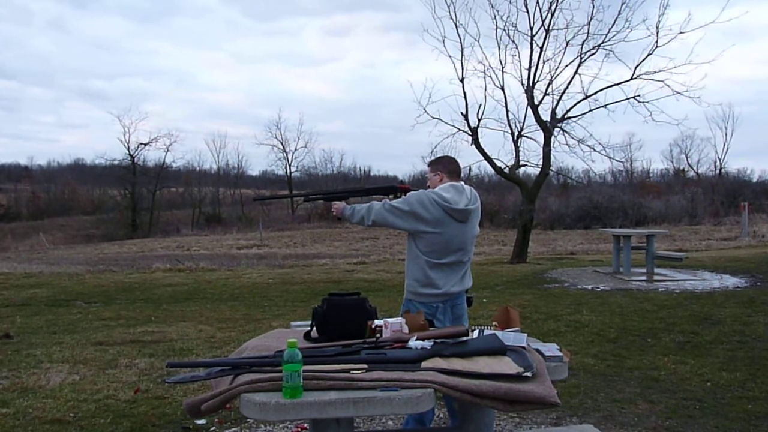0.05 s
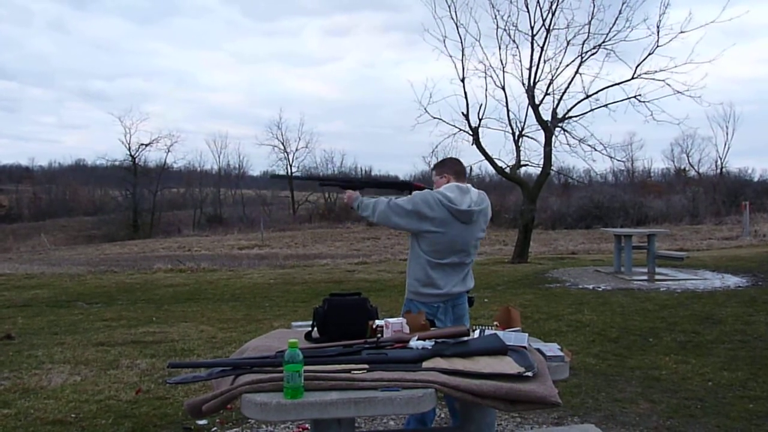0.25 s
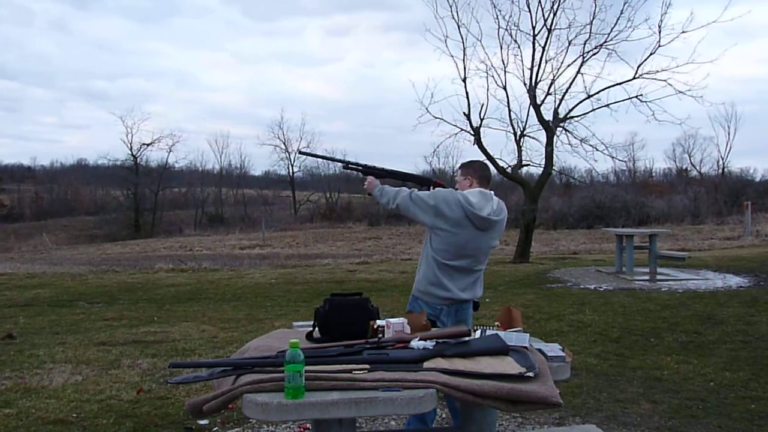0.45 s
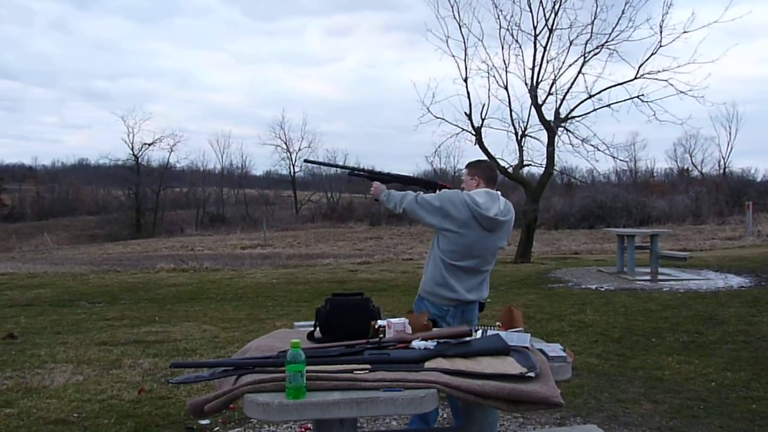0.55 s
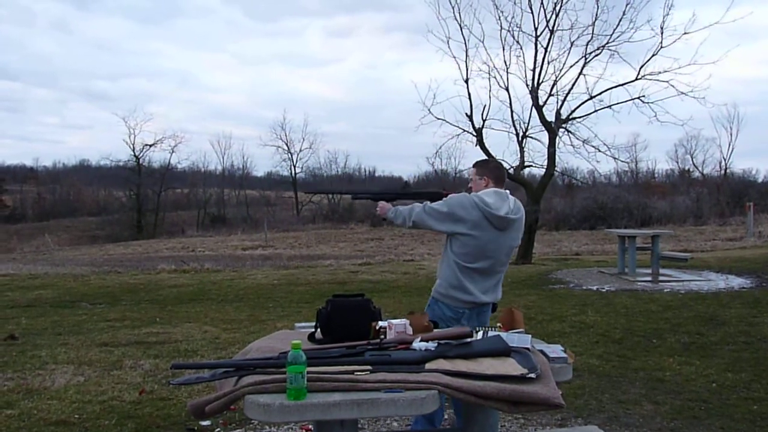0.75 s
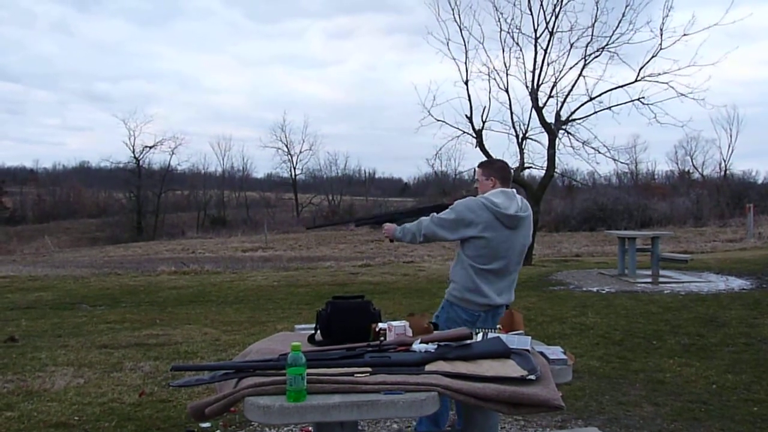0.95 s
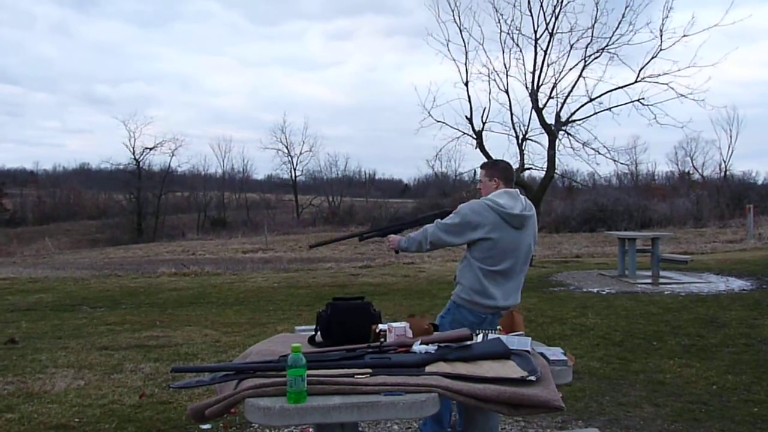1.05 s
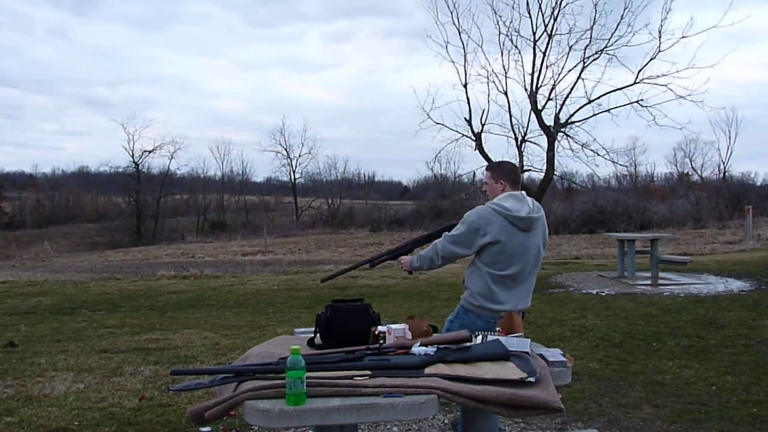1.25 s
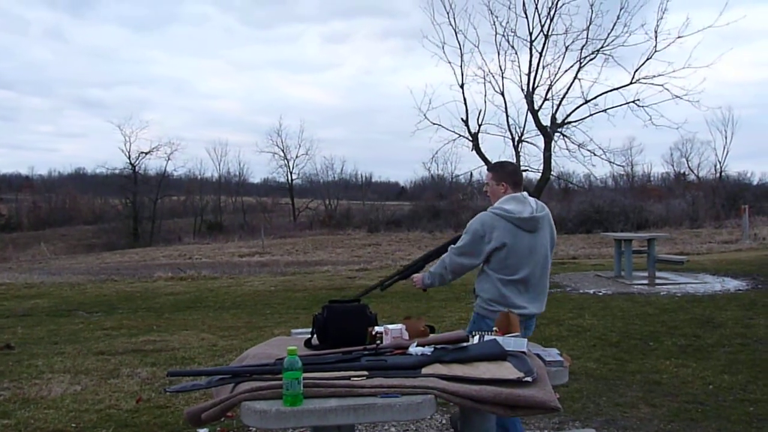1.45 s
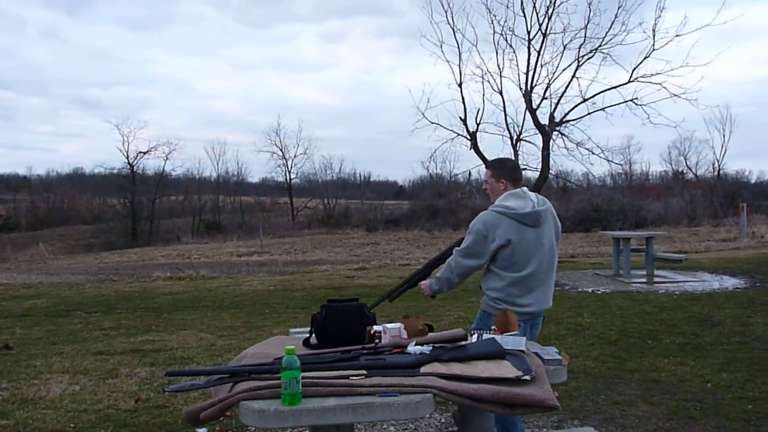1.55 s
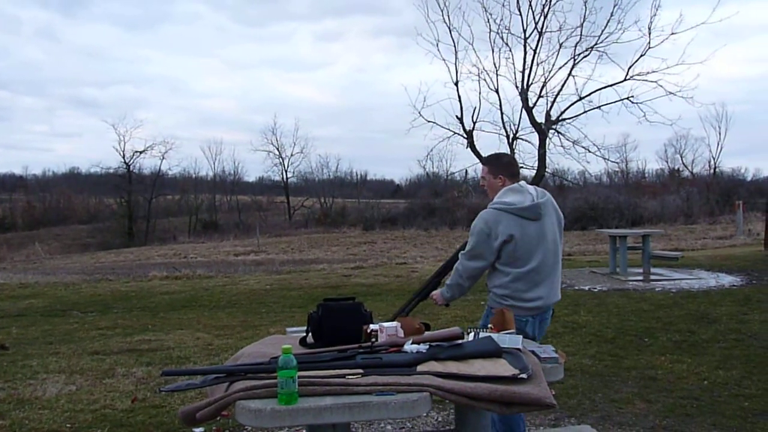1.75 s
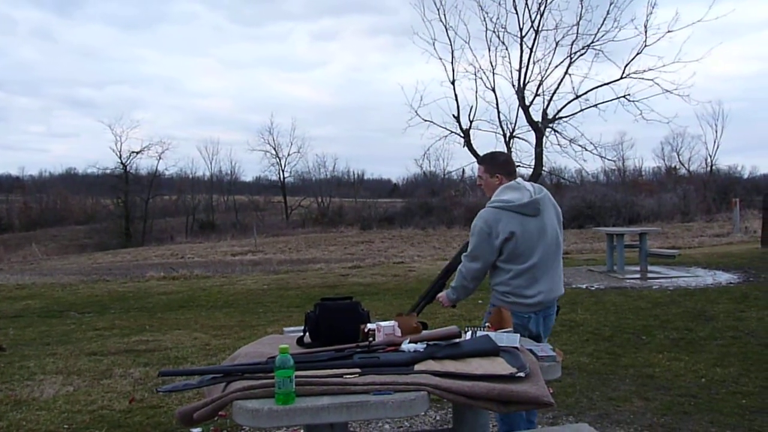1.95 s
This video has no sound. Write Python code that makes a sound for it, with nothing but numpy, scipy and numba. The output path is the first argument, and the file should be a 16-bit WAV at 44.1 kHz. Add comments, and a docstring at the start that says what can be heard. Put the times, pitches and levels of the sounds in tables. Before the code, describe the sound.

One sharp, overloaded gunshot outdoors, followed by a long, low rumbling echo that slowly dulls and fades

```python
"""Shotgun blast in an open field

One shot is heard a few metres from a small camera. Two shocks make its crack, pulses with a rasp overload
the microphone, and a slow swing makes it lurch. Showers of tiny echoes and separate booms and claps return
from the ground, brush and trees as a long roll that grows dull. Two clicks and a faint falling whistle
follow. Filtered noise makes the quiet outdoor background."""
import sys
import numpy as np
from scipy import signal
from scipy.fft import rfft, irfft
from scipy.io import wavfile
from scipy.ndimage import uniform_filter1d
from numba import njit

SR = 44100
rng = np.random.default_rng(int(sys.argv[2]) if len(sys.argv) > 2 else 0)


def master_out(mix):
    """Clip the mix to full scale and print it as 16-bit PCM to the path in sys.argv[1]."""
    frames = np.transpose(np.atleast_2d(mix))
    ceiling = np.clip(frames, -1, 1)
    pcm = np.round(ceiling * 32767).astype(np.int16)
    wavfile.write(sys.argv[1], SR, pcm)


N = 88200  # samples: two seconds

# Tone of the crack, before its level is set: pitch_hz, level_db
CRACK_COLOUR = [(100, -31), (600, -16), (1300, 10), (1850, -3), (2400, 4.5), (3100, 1), (4200, -12),
                (7000, -11), (8200, -30), (9000, -34)]
# Slams of the blast and its ground bounces on the microphone: start_s, peak_db (before their tone filter)
SLAMS = [(0.2184, -13), (0.2202, -18), (0.2245, -19.5), (0.225, -24), (0.2254, -14.5), (0.2280, -16.5),
         (0.2305, -20.5), (0.2320, -16.5)]
# Tone filter of the slams: pitch_hz, gain_db
SLAM_COLOUR = [(100, 6.5), (1200, 0.5), (2800, -1), (4200, -7), (6000, -10), (9000, -21)]
# Relative tone of the overload's buzz: pitch_hz, level_db
RASP_COLOUR = [(300, -6), (1300, 6), (2800, 6), (4200, -25), (9000, -47)]
# Relative tone of the scatter and of far claps: pitch_hz, level_db (per Hz)
SCATTER_COLOUR = [(20, -42.5), (45, -35.5), (85, -25), (125, -9.5), (165, -2), (215, 3.5), (310, 1),
                  (400, -9), (480, -12), (620, -11.5), (810, -7.5), (1100, -11), (1400, -13), (2150, -21),
                  (2800, -28.5), (3400, -40), (4300, -53.5), (6000, -66), (9000, -80)]
# Scatter from grass and brush, one row per register, low to high, before the shared level:
# level_db, fade_start_s, decay_db_per_s
SCATTER = [(-52, 0.3, 8), (-29, 0.97, 17.5), (-37, 0.7, 16.5), (-32.5, 1.058, 23.5), (-40.5, 0.92, 26.5)]
# Borders between the scatter registers: pitch_hz
SCATTER_SPLIT_HZ = (110, 390, 650, 1750)
# Shared level of all the scatter over time, held down just after the shot and
# recovering as the camera's gain recovers: time_s, level_db
SCATTER_LEVEL = [(0.218, -23), (0.238, 0.5), (0.275, 0), (0.31, -1.5), (0.37, -4), (0.41, -3), (0.51, -1.5),
                 (0.6, -1.5), (0.71, -0.5), (0.77, 1.5), (0.85, -1.5), (0.9, 0), (0.97, -2), (1.1, 0.5),
                 (1.22, -2), (1.35, 0.5), (1.65, 1.5), (2.0, 2)]
# Relative tone of the nearest tree and benches answering: pitch_hz, level_db
NEAR_COLOUR = [(200, -5.5), (500, 11), (1200, 9), (2700, 1.5), (4200, -19), (6000, -33), (9000, -53)]
# Separate echoes from trees and banks, before the overall lift:
# time_s, spread_s, bass_db, middle_db, treble_db
ECHOES = [(0.258, 0.0053, -28.5, -22, -41), (0.277, 0.0075, -28, -32.5, -36),
          (0.326, 0.0078, -30, -35.5, -61), (0.35, 0.0053, -26, -27.5, -37.5),
          (0.389, 0.0041, -22, -28, -39.5), (0.427, 0.0015, -19.5, -24, -48),
          (0.445, 0.0066, -22, -23, -42), (0.456, 0.0035, -20, -46, -40.5),
          (0.489, 0.0062, -19.5, -31, -36), (0.533, 0.0089, -27.5, -31, -46),
          (0.545, 0.0053, -33, -37, -37), (0.573, .007, -29.5, -24.5, -41),
          (0.607, 0.0018, -19.5, -24, -41), (0.629, 0.0046, -19, -24.5, -62),
          (0.64, 0.0012, -41, -26.5, -48), (0.6476, 0.0024, -13, -41, -56),
          (0.67, 0.0062, -24.5, -28.5, -39.5), (0.687, .004, -28, -28.5, -36.5),
          (0.742, 0.0016, -32, -43, -40), (0.755, 0.011, -24.5, -32, -39), (0.778, 0.0029, -25, -26, -52),
          (0.828, 0.0017, -29, -24, -41), (0.894, 0.0043, -22, -31, -46),
          (0.911, 0.0046, -22.5, -26.5, -54), (0.948, 0.0027, -29, -31.5, -64),
          (1.025, 0.0023, -24, -41, -34.5), (1.051, 0.0082, -33, -32.5, -42.5),
          (1.089, 0.0029, -23.5, -45, -36.5), (1.132, .003, -27, -30, -49),
          (1.183, 0.0031, -32.5, -31.5, -62), (1.306, 0.012, -26, -49, -65),
          (1.334, 0.004, -44, -36.5, -58), (1.356, 0.0071, -30.5, -41, -48), (1.396, 0.0043, -31, -57, -73),
          (1.457, 0.014, -33.5, -63, -52.5), (1.561, 0.0044, -32, -44.5, -70),
          (1.619, 0.0077, -33, -42.5, -58), (1.755, 0.0074, -41.5, -58, -61),
          (1.844, 0.0082, -52, -46, -57), (1.877, 0.0028, -42, -60, -70), (1.953, 0.0091, -40, -46.5, -75)]
# Borders between the bass, middle and treble of a clap: pitch_hz
CLAP_SPLIT_HZ = (583, 1577)
# Relative tone of near claps: pitch_hz, level_db (per Hz)
CLAP_COLOUR = [(25, -20.5), (50, -23), (85, -26), (125, -14.5), (165, -1.5), (230, -1), (330, 4.5),
               (420, -1.5), (600, -6), (850, -7.5), (1300, -10), (2150, -15), (2800, -19), (3400, -30),
               (4300, -43), (6000, -52), (9000, -74.5)]
# Band of the echoes that the ground bounce cancels: time_s, notch_hz, depth (0 to 1)
GROUND_NOTCH = [(0.4, 550, 0.09), (0.6, 570, 0.73), (0.7, 520, .3), (0.799, 550, 1), (0.87, 620, 0.65),
                (1.0, 557, 0.25), (1.4, 467, 0.64), (1.65, 455, 0.43), (2.0, 424, 0.66)]
# Light clicks, probably the gun being lowered: start_s, level_db
CLICKS = [(1.475, -47.5), (1.516, -47.5)]
# Relative tone of the clicks: pitch_hz, level_db
CLICK_COLOUR = [(1000, -24), (2400, -7), (2900, 4), (3450, -4), (4000, -24), (8000, -42)]
# Relative tone of the outdoor background: pitch_hz, level_db (per Hz)
AIR_COLOUR = [(25, -15.5), (60, -5.5), (105, 6), (170, -1.5), (350, -11), (800, -12.5), (1700, -25.5),
              (3500, -28.5), (6500, -28.5), (7800, -30.5), (9000, -56.5)]

SHOT_S = 0.2167
CRACK_DB, CRACK_MS = -26, 0.38  # loudness taken over 3 ms; gap between the two shocks
TAIL_SHOCK = 5.8  # size of the second shock against the first
SLAM_RISE_MS, SLAM_FALL_MS = 0.28, 0.22
RASP_DB = -13  # buzz against the slams
LURCH_DB, LURCH_S = -32, 0.026  # peak and length of the microphone's slow swing
SCATTER_PER_S, SCATTER_SPREAD_DB = 4000, 3  # number of tiny echoes; variation in their size
FLUTTER_DB, FLUTTER_PER_S = 1.09, 90  # typical wavering of the scatter; new levels per second
NEAR_DB, NEAR_S, NEAR_FADE_S = -26, 0.234, 0.056
ECHO_DB = 1  # lift of all separate echoes
CLAP_ATTACK_SHARE = 0.73  # rise of a clap against its spread
FAR_FROM_S, FAR_BY_S = 0.74, 1.074  # claps change from near to far tone over this time
BOOM_HZ, BOOM_SPREAD_OCTAVES = 278.3, 0.14  # centre pitch at the shot; random variation
BOOM_SAG_OCTAVES_PER_S = 0.37  # later booms are deeper
BOOM_SHARE = 0.58  # part of the bass power in a smooth boom; the rest is noise
NOTCH_WIDTH_HZ = 353
CLICK_FADE_S = 0.0036
WHISTLE_S, WHISTLE_SPREAD_S, WHISTLE_DB = 1.73, 0.048, -48  # centre time, swell width, typical peak
WHISTLE_HZ, WHISTLE_SAG_HZ_PER_S = 1260, 600  # pitch at the centre, before wavering; fall
AIR_DB = -54
TOP_HZ = 8600  # upper limit of the camera's sound
OFFSET = -0.0082  # steady offset of the camera's converter


def blast(t):
    """Two shocks, rasping one-sided slams and a slow lurch from the pressure wave on the microphone."""
    age = t - SHOT_S
    first_shock = np.sinc(age * SR)
    second_shock = TAIL_SHOCK * np.sinc((age - CRACK_MS / 1000) * SR)
    crack = colour(first_shock + second_shock, CRACK_COLOUR)
    crack = undb(CRACK_DB) * crack / np.sqrt(np.sum(crack ** 2) / (0.003 * SR))
    slams = 0
    for start, db in SLAMS:
        rise = 1 - np.exp(-((t - start) * 1000 / SLAM_RISE_MS) ** 2)
        pulse = fade(t - start, SLAM_FALL_MS / 1000) * rise
        slams = slams + undb(db) * pulse / pulse.max()
    rasp = undb(RASP_DB) * slams * unit(colour(rng.standard_normal(N), RASP_COLOUR))
    lurch = undb(LURCH_DB) * np.sin(np.pi * np.clip(age / LURCH_S, 0, 1)) ** 2
    return crack - colour(slams, SLAM_COLOUR) + rasp - lurch


def rolling_echo(t):
    """Scatter from the field dies away, the highest register fastest; the nearest things answer brightly."""
    level_db = np.interp(t, *np.array(SCATTER_LEVEL).T)
    level = (t > SHOT_S) * undb(level_db + FLUTTER_DB * walk(FLUTTER_PER_S))
    bands = registers(reflections(SCATTER_COLOUR), SCATTER_SPLIT_HZ)
    scatter = 0
    for band, (db, start, decay) in zip(bands, SCATTER):
        scatter = scatter + even(band, 0.027) * undb(db - decay * np.maximum(t - start, 0))
    near_shape = fade(t - NEAR_S, NEAR_FADE_S) - fade(t - NEAR_S, 0.0015)  # quick rise, slower fade
    near = unit(colour(rng.standard_normal(N), NEAR_COLOUR)) * near_shape
    return scatter * level + undb(NEAR_DB) * near


def distinct_echoes(t):
    """Each large reflector returns a short boom and a smeared clap; far claps take the scatter's tone."""
    rows = np.array(ECHOES)
    times, spreads = rows[:, :1], rows[:, 1:2]
    late = t - times
    skewed = np.where(late < 0, late / CLAP_ATTACK_SHARE, late)  # rises faster than it falls
    shapes = np.exp(-0.5 * (skewed / spreads) ** 2)

    far = np.interp(t, [FAR_FROM_S, FAR_BY_S], [0, 1])
    near_claps = np.sqrt(1 - far) * unit(reflections(CLAP_COLOUR))
    far_claps = np.sqrt(far) * unit(reflections(SCATTER_COLOUR))
    bands = registers(near_claps + far_claps, CLAP_SPLIT_HZ)
    bass, middle, treble = (even(band, 0.016) * (undb(db) @ shapes)
                            for band, db in zip(bands, rows[:, 2:].T))

    pitch_chance, phase_chance = rng.standard_normal((2, len(rows), 1))
    octaves = BOOM_SPREAD_OCTAVES * pitch_chance - BOOM_SAG_OCTAVES_PER_S * (times - SHOT_S)
    cycles = BOOM_HZ * 2 ** octaves * late + phase_chance
    boom = undb(rows[:, 2]) @ (shapes * np.sqrt(2) * np.sin(2 * np.pi * cycles))
    low = np.sqrt(BOOM_SHARE) * boom + np.sqrt(1 - BOOM_SHARE) * bass
    return undb(ECHO_DB) * (low + middle + treble)


def reflections(points):
    """Thousands of tiny copies of the shot, of random size and delay, dulled by air and ground."""
    arrives = rng.random(N) < SCATTER_PER_S / SR
    signs = np.sign(rng.standard_normal(N))
    sizes = signs * undb(SCATTER_SPREAD_DB * rng.standard_normal(N))
    return colour(arrives * sizes, points)


def over_ground(x, t):
    """Sound grazing the field loses a band that shifts with the path."""
    time, hz, depth = np.array(GROUND_NOTCH).T
    band = band_pass(x, np.interp(t, time, hz), float(NOTCH_WIDTH_HZ))
    return x - np.interp(t, time, depth) * band


def clicks(t):
    """Small dry metallic ticks made of filtered noise that dies quickly."""
    ring = unit(colour(rng.standard_normal(N), CLICK_COLOUR))
    return ring * sum(undb(db) * fade(t - start, CLICK_FADE_S) for start, db in CLICKS)


def whistle(t):
    """A thin wavering tone swells and fades while its pitch sinks."""
    age = t - WHISTLE_S
    hz = WHISTLE_HZ - WHISTLE_SAG_HZ_PER_S * age + 12 * walk(80)
    level = undb(WHISTLE_DB + 2 * walk(60))
    swell = np.exp(-0.5 * (age / WHISTLE_SPREAD_S) ** 2)
    return level * swell * np.sin(2 * np.pi * np.cumsum(hz) / SR)


def background():
    """Filtered noise gives a low outdoor rumble and a thin steady hiss."""
    return undb(AIR_DB) * unit(colour(rng.standard_normal(N), AIR_COLOUR))


def undb(db):
    """Turn decibels into a multiplier."""
    return 10 ** (np.asarray(db) / 20)


def unit(x):
    """Scale to an average strength (rms) of 1."""
    return x / np.sqrt(np.mean(x ** 2))


def colour(x, points):
    """Filter the tone along pitch_hz, level_db points, with no sound ahead of its cause."""
    hz, db = np.array(points, float).T
    f = np.arange(N + 1) * SR / (2 * N)
    gain = undb(np.interp(np.log(f + 1), np.log(hz), db))
    # Folding the cepstrum forward in time gives a minimum-phase filter
    cepstrum = irfft(np.log(gain))
    cepstrum[1:N] *= 2
    cepstrum[N + 1:] = 0
    return irfft(rfft(x, 2 * N) * np.exp(rfft(cepstrum)))[:N]


def registers(x, splits):
    """Split into pitch bands at the given frequencies, each of rms 1."""
    f = np.arange(N // 2 + 1) * SR / N
    below = [0 * f] + [1 / (1 + (f / hz) ** 12) for hz in splits] + [0 * f + 1]
    spectrum = rfft(x)
    return [unit(irfft(spectrum * share, N)) for share in np.diff(below, axis=0)]


def even(x, seconds):
    """Hold a noise near rms 1 by dividing by its smoothed strength."""
    size = max(int(seconds * SR), 2)
    power = uniform_filter1d(uniform_filter1d(x ** 2, size), size)
    return x / np.sqrt(power + 1e-9)


def walk(rate):
    """Random levels with glides between them, rate new ones per second, rms 1."""
    size = int(SR / rate)
    steps = rng.standard_normal(N)[np.arange(N) // size]
    return unit(uniform_filter1d(steps, size))


def fade(age, seconds):
    """Start suddenly at age 0, then die away exponentially."""
    return (age >= 0) * np.exp(-np.maximum(age, 0) / seconds)


@njit
def band_pass(x, hz, width):
    """Keep a band around a moving centre, using a state-variable filter."""
    y, band, low = np.empty(len(x)), 0., 0.
    for i in range(len(x)):
        g, damping = np.tan(np.pi * hz[i] / SR), width / hz[i]
        v = (band + g * (x[i] + 1e-18 - low)) / (1 + g * (g + damping))
        band, low, y[i] = 2 * v - band, low + 2 * g * v, damping * v
    return y


def scene():
    """The shot, its echoes, the small later sounds and the quiet field, in mono."""
    t = np.arange(N) / SR
    echoes = over_ground(rolling_echo(t) + distinct_echoes(t), t)
    return (blast(t) + echoes + clicks(t) + whistle(t) + background())[None]


def record(dry):
    """The camera rounds the highest peaks, cuts the top and adds its offset."""
    ceiling = undb(-5.5)
    rounded = ceiling * np.tanh(dry / ceiling)
    low_pass = signal.ellip(8, 0.2, 70, TOP_HZ, fs=SR, output="sos")
    return signal.sosfilt(low_pass, rounded) + OFFSET


dry = scene()
out = record(dry)
master_out(out)
```